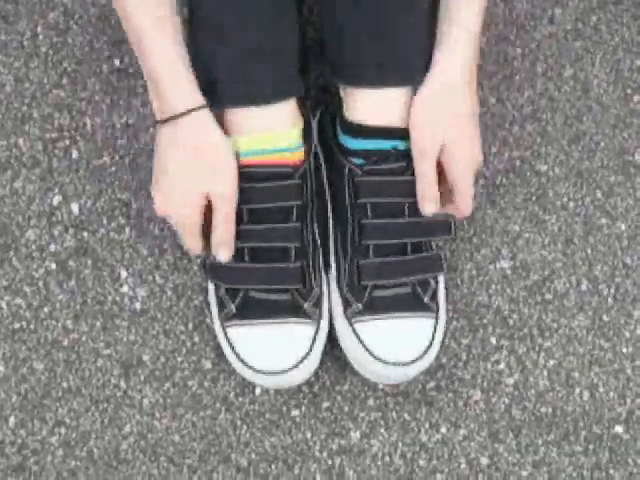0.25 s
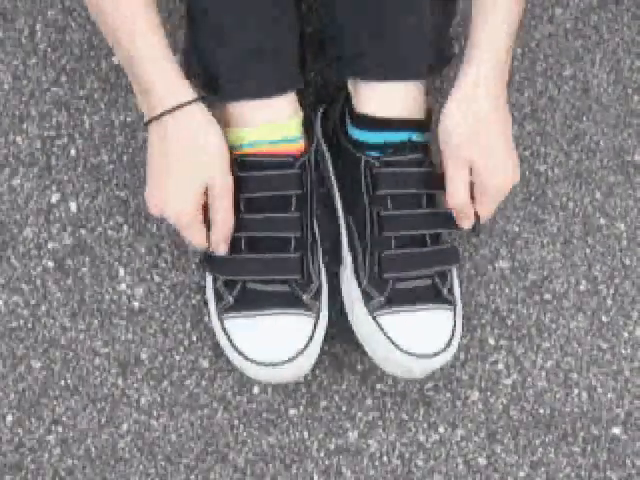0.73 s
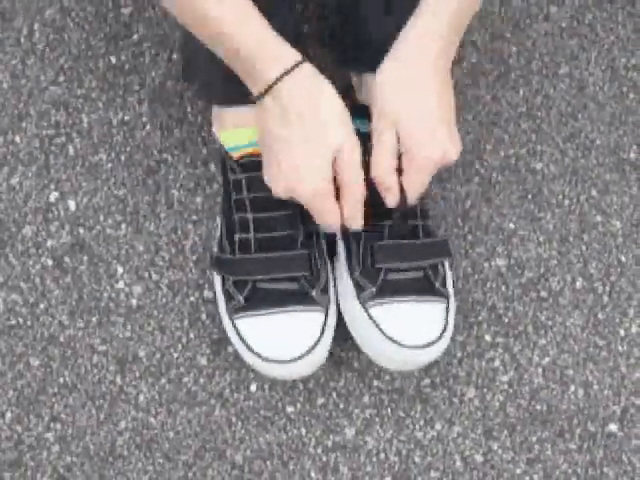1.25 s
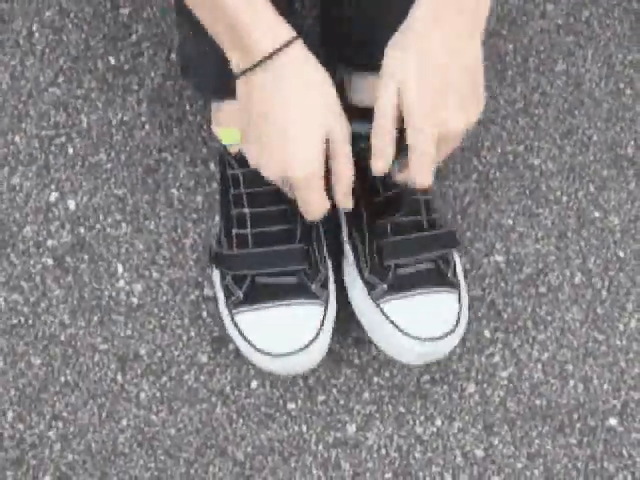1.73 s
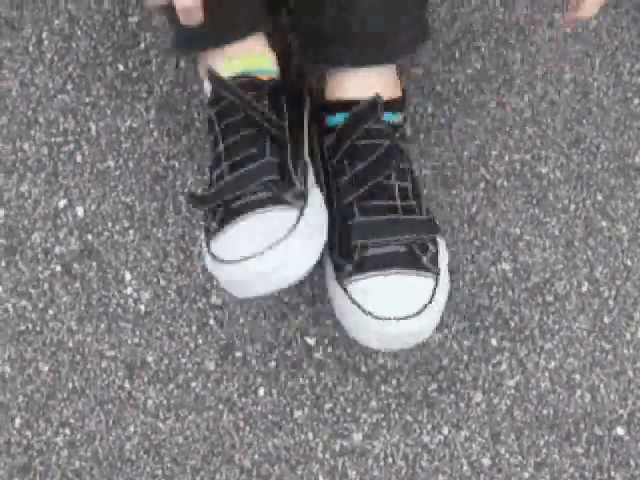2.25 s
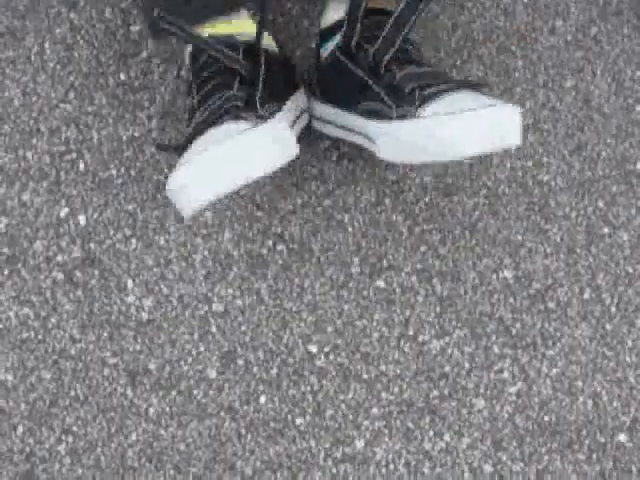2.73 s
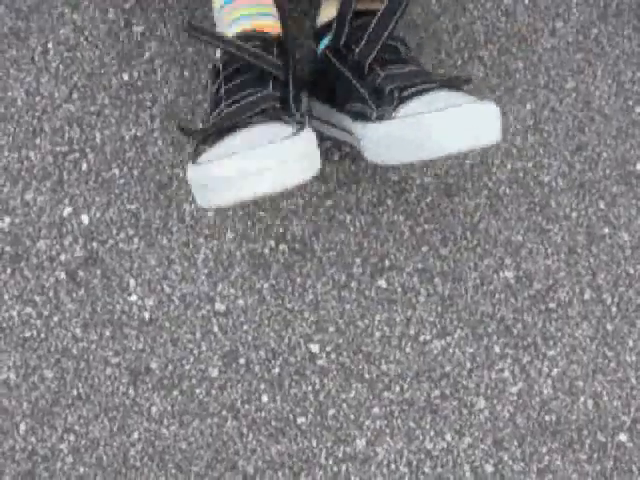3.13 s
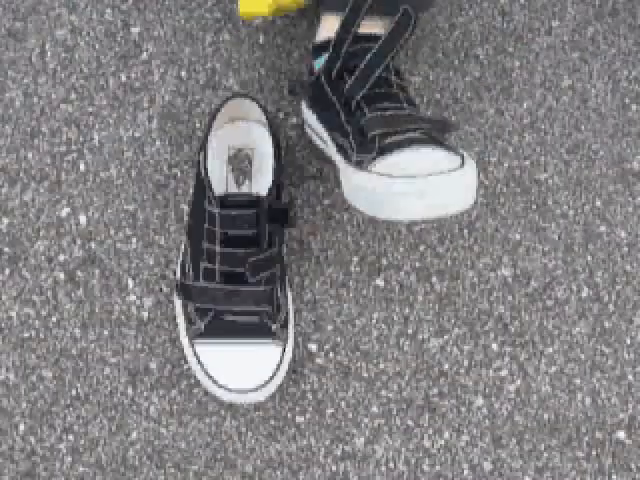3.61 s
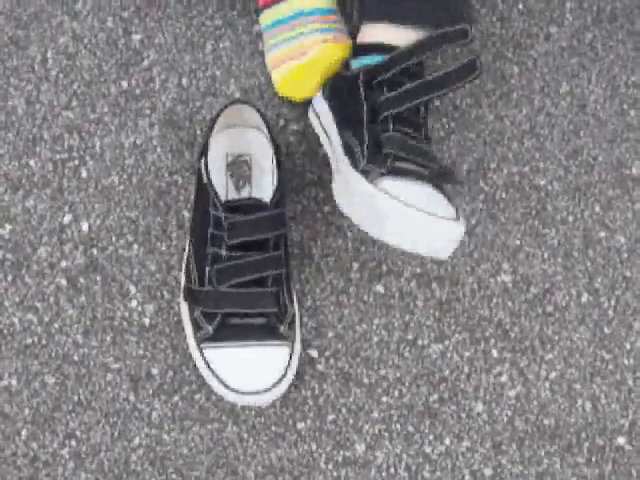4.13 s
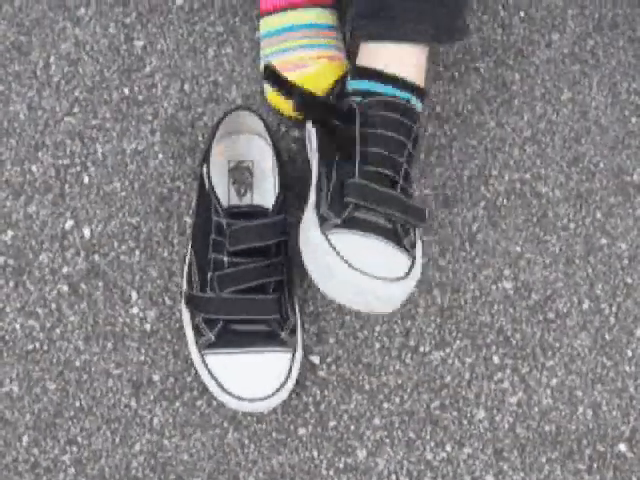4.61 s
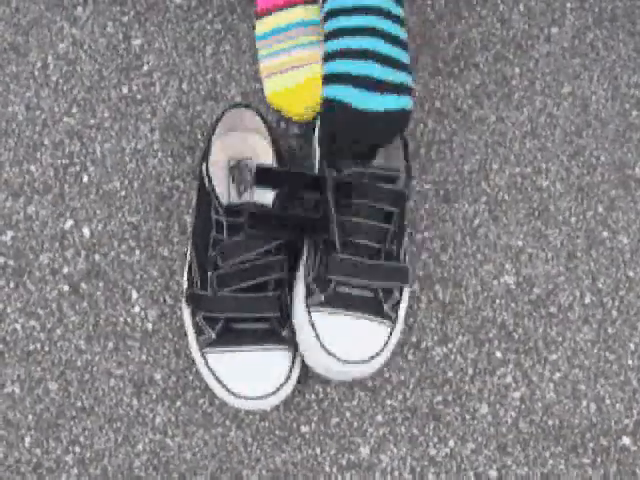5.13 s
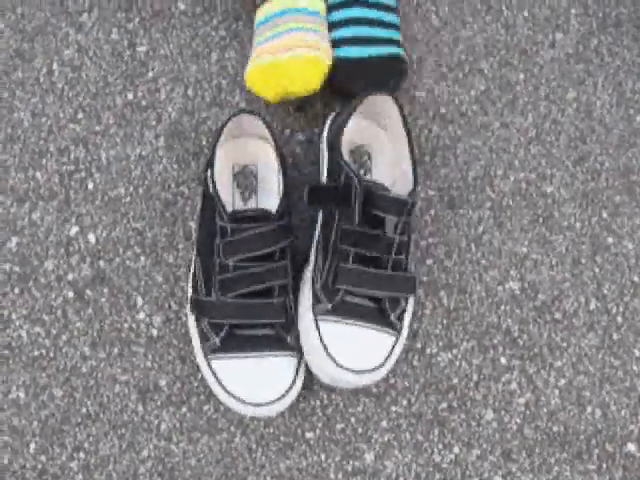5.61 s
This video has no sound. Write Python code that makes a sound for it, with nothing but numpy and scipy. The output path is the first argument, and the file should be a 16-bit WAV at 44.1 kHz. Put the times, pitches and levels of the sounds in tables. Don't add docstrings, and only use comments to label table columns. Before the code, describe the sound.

Hook-and-loop shoe straps rip open in rapid harsh tears, rubber squeaks, then a dropped shoe slaps asphalt amid steady cricket chirps.

```python
import sys
import numpy as np
from scipy import signal
from scipy.fft import rfft, irfft
from scipy.io import wavfile
from scipy.ndimage import uniform_filter1d

SR = 44100
rng = np.random.default_rng(int(sys.argv[2]) if len(sys.argv) > 2 else 0)


def invert_db(x):
    u = np.asarray(x, float) / 20
    return 10 ** u


def to_wav(s):
    ch = np.atleast_2d(s).T
    pcm = np.round(np.clip(ch, -1, 1) * 32767)
    wavfile.write(sys.argv[1], SR, pcm.astype(np.int16))


N = 258426
T = np.arange(N) / SR
HZ = np.arange(N // 2 + 1) * SR / N


def level(x, db):
    return x * invert_db(db) / np.sqrt(np.mean(x ** 2))


def band(x, hz, width_hz):
    return signal.lfilter(*signal.iirpeak(min(hz, .45 * SR), hz / width_hz, fs=SR), x)


def highpass(x, order, hz):
    return signal.sosfilt(signal.butter(order, hz, "high", fs=SR, output="sos"), x)


def shape(points):
    hz, db = np.transpose(points)
    return invert_db(np.interp(np.log(HZ + 1), np.log(hz), db))


def track(rows, fade_s):
    s, *columns = np.transpose(rows)
    gate = np.clip(np.minimum(T - s[0], s[-1] - T) / fade_s + .5, 0, 1)
    return (gate, *(np.interp(T, s, c) for c in columns))


def walk(rate):
    k = int(SR / rate)
    steps = np.repeat(rng.standard_normal(N // k + 1), k)
    return 1.184 * uniform_filter1d(uniform_filter1d(steps, k), k)[:N]


def clicks(per_s, spread_db):
    size = invert_db(np.minimum(spread_db * rng.exponential(size=N), 13)) * rng.choice([-1, 1], N)
    return size * (rng.random(N) < per_s / SR)


def ring(t, hz, t60, rise_s):
    return -np.sin(2 * np.pi * hz * t) * invert_db(-60 * t / t60) * (1 - np.exp(-t / rise_s))


def add(out, s, x):
    i = int(s * SR)
    out[i:i + len(x)] += x[:N - i]


# t/s, pull level/dB, tautness/1 (0 slack, 1 taut)
PEEL = [
    [(0.6, -55.5, 0), (0.734, -52.5, 0.3), (0.741, -31, 0.1), (0.77, -31.5, 0.2), (0.806, -33.5, 0),
     (0.822, -41, 0)],
    [(0.822, -39, 0.3), (0.832, -27, .55), (0.9, -25.5, .65), (0.95, -27, 1), (1.0, -29.5, 0.98),
     (1.1, -25, 0.96), (1.155, -32.5, 1), (1.17, -38.5, 0.7), (1.205, -45, 0.7)],
    [(1.22, -48, 0.7), (1.247, -54, .5), (1.262, -33.5, .2), (1.274, -45, 0.3), (1.31, -34, 0.7),
     (1.34, -27.5, 1), (1.358, -26.5, .9), (1.372, -53, 0.93)],
]


def straps():
    tugs = [clicks(1500, spread_db=4.0) for _ in HOOKS]
    all_tugs = sum(tugs)
    s, _, taut = np.concatenate(PEEL).T
    hooks = hook_modes(tugs, np.interp(T, s, taut))
    treble = highpass(hooks, 2, 5600)
    hollow = shoe_cavity(all_tugs)
    flap = level(band(band(all_tugs, 1380, 280), 1270, 700), 0)
    jerk = invert_db(1.4 * walk(150))
    out = np.zeros(N)
    for rows, free_db in zip(PEEL, (2, 1.5, -9.5)):
        gate, db, taut = track(rows, 0.0044)
        bright = invert_db(-7.5 + 11 * taut)
        drum = invert_db(-12.5 + 8 * taut)
        slack = invert_db(-9 - 6 * taut)
        mix = hooks + (bright - 1) * treble + drum * hollow + slack * invert_db(free_db) * flap
        out += gate * jerk * invert_db(db - 1.5) * mix
    return out + tears()


# f/Hz, level/dB
HOOKS = [(2500, 1.5), (3200, -1), (4000, -9.5), (5000, -2.5), (5800, -5.5), (6600, -6.5), (7300, -3),
         (8200, -18.5)]


def hook_modes(tugs, taut):
    sing_hz = 2700 * (7000 / 2700) ** taut
    hooks = np.zeros(N)
    for x, (hz, db) in zip(tugs, HOOKS):
        lift_db = 4 * np.exp(-(np.log2(hz / sing_hz) / 0.27) ** 2)
        patchy_db = 1.4 * walk(13.94)
        hooks += invert_db(db + patchy_db + lift_db) * band(x, hz, 0.23 * hz)
    return highpass(level(hooks, 0), 5, 2150)


# f/Hz, width f/Hz, level/dB
HOLLOW = [(250, 450, -10), (522, 197, -6.5), (665, 134, -8), (960, 150, 0.5), (1068, 155, -4.5)]


def shoe_cavity(tugs):
    modes = [invert_db(db) * band(band(tugs, hz, w), hz, 3 * w) for hz, w, db in HOLLOW]
    return level(sum(modes), 0)


# t/s, peak level/dB, colour f/Hz
TEARS = [(0.609, -22.5, 3200), (0.628, -19, 4200), (0.636, -18, 4130), (0.654, -16.5, 2570),
         (0.681, -18, 2410), (0.6924, -15, 2830), (0.6996, -20.5, 2760), (0.7138, -16.5, 4420),
         (0.7188, -10.5, 2760), (0.7224, -18.5, 2870), (0.7327, -18, 2750), (0.7408, -10.5, 4500),
         (0.7471, -8.5, 2880), (0.7555, -18, 2390), (0.7732, -12, 2700), (0.7936, -8.5, 2370),
         (0.7995, -4, 2990), (0.833, -10.5, 5140), (0.8884, -11.5, 4580), (0.897, -3.5, 5050),
         (1.1627, -36.5, 2870), (1.186, -14.5, 4800), (1.1972, -16.5, 3020), (1.2235, -22, 6180),
         (1.2562, -19, 3250), (1.263, -16.5, 3300), (1.2662, -24.5, 3570), (1.291, -11, 3250),
         (1.301, -13, 5340), (1.3273, -11, 6620)]


def tears():
    out, t = np.zeros(N), T[:500]
    for s, db, hz in TEARS:
        noise = rng.standard_normal(500)
        burst = noise * np.abs(noise) * t * np.exp(-t / 0.0011)
        burst = band(burst, hz, .4 * hz) + .45 * band(burst, 4800, 4500)
        add(out, s, invert_db(db - 8.5) * burst / np.abs(burst).max())
    return out


# delay t/s, f/Hz, level/dB, decay t60/s
SLAP = [
    (0, 2350, -11, .006),
    (.0001, 3050, -10, .007),
    (.0008, 6100, -19, .0035),
    (.0006, 4300, -22, .003),
    (.0007, 960, -3.5, .014),
    (0, 625, -4.5, .019),
    (.0003, 1350, -10, .008),
    (0, 655, -24, .05),
    (.0007, 200, -20, .03),
]


def slap():
    out, t = np.zeros(N), T[:2600]
    for delay_s, hz, db, t60 in SLAP:
        add(out, 3.5462 + delay_s, invert_db(1 + db) * ring(t, hz, t60, rise_s=.0008))
    return out


# t/s, crack peak level/dB, crack f/Hz, body f/Hz, body level/dB
TAPS = [(1.7398, -36, 3480, 527, -51), (2.5103, -39, 2350, 570, -49.5), (2.9154, -26, 2850, 530, -50),
        (3.56, -25.5, 2490, 664, -51), (3.6406, -45, 2590, 647, -41.5), (3.668, -47, 2770, 457, -42.5),
        (4.576, -36.5, 2440, 544, -64), (4.656, -23.5, 2600, 543, -39.5), (4.6733, -42, 2990, 511, -66),
        (4.6877, -33, 2690, 540, -52), (4.707, -39.5, 3720, 447, -61), (4.7124, -48, 3420, 468, -60),
        (4.7745, -24, 2180, 570, -42.5), (4.998, -36.5, 3020, 497, -59), (5.125, -46, 3410, 530, -49),
        (5.3463, -40, 2330, 791, -69), (5.3574, -48, 3460, 487, -65), (2.089, -34.5, 2500, 890, -57),
        (2.273, -57, 3500, 940, -46), (3.5318, -30, 2300, 610, -36), (3.537, -50.5, 3000, 780, -38)]


def taps():
    out, t = np.zeros(N), T[:2600]
    for s, crack_db, crack_hz, hz, body_db in TAPS:
        noise = rng.standard_normal(2600)
        crack = (noise + 6 * (t == 0)) * np.exp(-t / 0.0008)
        crack = band(crack, crack_hz, 820) + 0.28 * band(crack, 4200, 2500)
        crack = band(crack, 3200, 3500)
        knock = ring(t, hz, 0.025, 0.0019) + 0.6 * ring(t, 1.84 * hz, 0.011, 0.00026)
        add(out, s, invert_db(crack_db - 1.5) * crack / np.abs(crack).max() + invert_db(body_db + 14) * knock)
    return out


# t/s, slip rate f/Hz, level/dB
SQUEAKS = [
    [(2.093, 1756, -44.5), (2.099, 1156, -36.5), (2.106, 1067, -51)],
    [(2.125, 576, -29.5), (2.13, 561, -41.5), (2.144, 1410, -43)],
    [(2.146, 1270, -31), (2.15, 832, -32), (2.158, 835, -44.5), (2.163, 1043, -33.5), (2.169, 1374, -36.5),
     (2.176, 1192, -37), (2.186, 1176, -50)],
    [(2.238, 955, -52), (2.248, 1360, -40.5), (2.257, 1440, -56)],
    [(2.264, 741, -43), (2.277, 761, -39.5), (2.282, 1010, -39), (2.293, 1334, -40.5), (2.312, 1660, -49.5)],
]
# f/Hz, level/dB
RUBBER = [(1500, -3.5), (2500, -3), (3400, -10.5), (4400, -5), (5500, -13.5), (7000, -37)]


def squeaks():
    out = np.zeros(N)
    hiss = level(band(band(rng.standard_normal(N), 2300, 3100), 3200, 5000), 0)
    colour_hz, colour_db = np.transpose(RUBBER)
    wobble = 1 + 0.025 * walk(500)
    shudder = walk(250)
    flicker = {k: invert_db(4 * walk(170)) for k in range(2, 8)}
    for rows in SQUEAKS:
        gate, hz, db = track(rows, 0.00239)
        on = gate > 0
        phase = 2 * np.pi * np.cumsum(hz[on] * wobble[on]) / SR
        overtones = 0
        for k in range(2, 8):
            colour = invert_db(np.interp(k * hz[on], colour_hz, colour_db))
            overtones = overtones + np.cos(k * phase + 0.27 * k ** 2) * colour * flicker[k][on]
        grit = hiss[on] * (1 + np.cos(phase))
        louder = db[on] + 40
        slip = invert_db(db[on] + 3.1 * shudder[on]) * np.cos(phase)
        slip += invert_db(-42 + 0.5 * louder) * overtones
        slip += invert_db(-50 + 0.74 * louder) * grit
        out[on] += gate[on] * slip
    return out


# loudest t/s, length t/s, level/dB, weight on the sole level/dB
RUBS = [(1.752, 0.72, -70.5, -3), (2.484, 0.23, -76, 7), (2.84, 0.09, -63, -1.5), (2.95, 0.13, -66.5, 1.5),
        (3.043, 0.075, -64.5, 8), (3.135, 0.056, -64, 5.5), (3.208, .4, -73, 3), (3.674, 0.014, -67.5, 9),
        (3.725, 0.05, -83, 12), (3.543, .016, -59, 12.5), (4.72, .1, -80, 0), (5.004, 0.063, -63, 1),
        (5.076, 0.12, -67.5, 4.5), (5.343, 0.056, -63, -19.5)]


def scuff():
    grains = clicks(4000, spread_db=4.0)
    high = level(band(grains, 6500, 3500), 0)
    mid = level(band(grains, 2940, 1300), 0)
    low = level(band(clicks(1500, spread_db=1.5), 540, 430), 0)
    sole = mid + invert_db(3) * low
    fidgeting = (T > 1.4) & (T < 5.45)
    out = invert_db(-74) * fidgeting * (high + sole)
    for s, length_s, db, weight_db in RUBS:
        swell = np.exp(-(2 * (T - s) / length_s) ** 2)
        out += invert_db(db) * swell * (high + invert_db(weight_db) * sole)
    return out * invert_db(2 * walk(60))


# t/s, peak level/dB, length t/s
NEAR = [(0.1775, -38, .09), (0.5721, -39, .09), (0.94, -40, .09), (1.299, -42, .09), (1.6338, -40, .09),
        (2.0543, -41, .09), (2.3862, -39.5, .09), (2.691, -38.5, .09), (3.0178, -39, .09),
        (3.3645, -40, .09), (3.7719, -43, .05), (4.1725, -42.5, .09), (4.525, -43, .09), (4.871, -44, .09),
        (4.978, -42, .02), (5.2802, -44, .09), (5.622, -41.5, .09)]
HIGH = [(0.294, -47, .1), (1.508, -46.5, .1), (1.93, -48, .1), (2.315, -45, .05), (2.77, -46, .05),
        (3.148, -46.5, .1), (3.565, -55.5, .1), (3.9734, -50, .1), (4.3925, -49, .1), (4.808, -49, .1),
        (5.256, -52, .1), (5.68, -52, .1)]
LOW = [(0.222, -44, .05), (0.312, -42, .02), (1.345, -45, .05), (1.89, -44.5, .05), (2.405, -46, .05),
       (2.955, -43.5, .05), (3.378, -44, .05), (3.97, -50, .1), (4.57, -49, .05), (5.043, -47, .05),
       (5.472, -48, .05)]
FAR = [(0.046, -49, .09), (0.43, -54, .05), (0.498, -44, .02), (2.59, -54, .09), (3.72, -61, .02),
       (4.1, -53, .05), (4.35, -56, .02), (5.148, -57, .09), (5.77, -57, .05)]


def crickets():
    out = np.zeros(N)
    stroke_s = np.linspace(.018, .025, num=3)
    u = np.clip(T[:1500] / stroke_s[:, None], 0, 1)
    arch = np.sin(np.pi * u ** 0.56) ** 0.65
    for chirps, hz, gap_s in ((NEAR, 4960, .0365), (HIGH, 5110, .043), (LOW, 4570, .043), (FAR, 4760, .041)):
        phase = 2 * np.pi * np.cumsum(hz * (1.006 + 0.041 * u - .12 * u ** 2), axis=1) / SR
        pulses = arch * np.sin(phase)
        lates = (0, gap_s, gap_s * (1 + 1.15))
        for s, db, chirp_s in chirps:
            for late_s, swell_db, pulse in zip(lates, (-2, 0, 0), pulses):
                if late_s < chirp_s:
                    add(out, s + late_s - .003, invert_db(db + swell_db - 8) * pulse)
    return out


# t/s, second harmonic f/Hz, level/dB
CAW = [
    (5.43, 1200, -67),
    (5.52, 1170, -58),
    (5.6, 1170, -58),
    (5.69, 1140, -59.5),
    (5.725, 1150, -70),
    (5.77, 1200, -59.5),
    (5.86, 1104, -67),
]


def crow():
    gate, hz, db = track(CAW, 0.031)
    phase = np.pi * np.cumsum(hz * (1 + .035 * walk(230))) / SR
    voice = invert_db(-10) * np.sin(phase) + np.sin(2 * phase)
    voice += invert_db(-12 + 3.6 * walk(14)) * np.sin(3 * phase)
    return gate * invert_db(db + 2) * invert_db(2.5 * walk(70)) * voice


def chorus():
    throng = band(band(rng.standard_normal(N), 4770, 660), 4820, 700) * invert_db(walk(25))
    beat = np.clip(np.cos(2 * np.pi * 50 * T - .9) + 0.11, 0, 1) + 0.38
    trill_hz = 3480
    tone = np.sin(2 * np.pi * trill_hz * T + 2.5 * walk(12))
    tone += 14 * band(rng.standard_normal(N), trill_hz, 60)
    trill = beat * invert_db(1.2 * walk(5)) * tone
    return level(throng, -64.5) + level(trill, -66.5)


# f/Hz, first pulse t/s
CLOCKS = [
    (30.013, .03),
    (59.828, .01255),
]
# level/dB, scatter level/dB, width t/s
BUZZ = [
    (-33.5, 2, 0.00073),
    (-38.5, 2, 0.00073),
]


def buzz():
    out, t = np.zeros(N), T[:900] - .004
    for (hz, first_s), (db, scatter_db, width_s) in zip(CLOCKS, BUZZ):
        side_s = np.where(t < 0, width_s, 1.77 * width_s)
        dip = -np.exp(-np.sqrt(t ** 2 + 0.00012 ** 2) / side_s)
        ticks = first_s + np.arange(int(T[-1] * hz)) / hz
        for s, (size, shift) in zip(ticks, rng.standard_normal((len(ticks), 2))):
            add(out, s - .004 + 0.00022 * shift, invert_db(db + scatter_db * size) * dip)
    return highpass(out, 1, 18)


# f/Hz, level/dB per Hz
AIR = [(20, -68.5), (60, -67.5), (150, -77.5), (350, -82.5), (700, -89), (1500, -94), (3000, -96),
       (5500, -99), (9000, -101)]


def air():
    noise = irfft(rfft(rng.standard_normal(N)) * shape(AIR), N) * np.sqrt(SR / 2)
    return noise * invert_db(0.28 * walk(3.1))


# t/s, level/dB
GAIN = [
    (0, 1.5),
    (.74, 1),
    (1.4, 1),
    (3.54, 1),
    (3.58, -2),
    (4.3, -2.5),
    (5, -0.5),
    (5.86, -2),
]


def scene():
    near = straps() + slap() + taps() + squeaks() + scuff()
    tail = rng.standard_normal(3000) * invert_db(-60 * T[:3000] / 0.055 - 43.5)
    ground = signal.fftconvolve(near, tail)[:N]
    background = (chorus() + buzz() + air()) * invert_db(np.interp(T, *np.transpose(GAIN)))
    return (near + ground + crickets() + crow() + background)[None]


# f/Hz, level/dB
MIC = [(20, 1.5), (6000, 1), (7400, 0), (8000, -8), (8600, -15), (9000, -29)]


def half_rate_sampling(x):
    notch = 1 - 0.44 * np.exp(-((HZ - 6900) / 60) ** 2)
    direct = irfft(rfft(x) * shape(MIC) * notch * (HZ < 9050), N)
    flipped = direct * (-1) ** np.arange(N)
    image = irfft(rfft(flipped) * (HZ < 15900), N)
    return direct + invert_db(-5.0) * image


def low_pass(x):
    return signal.sosfilt(signal.butter(12, 16990, fs=SR, output="sos"), x)


def record(dry):
    mix = half_rate_sampling(dry[0])[None]
    return low_pass(mix)


dry = scene()
out = record(dry)
to_wav(out)
```